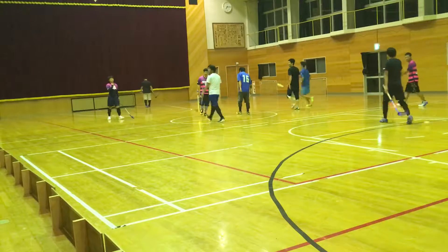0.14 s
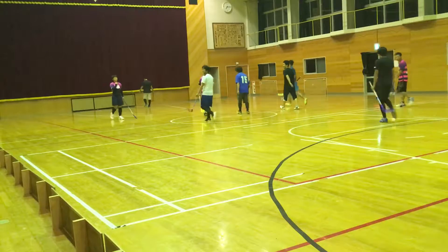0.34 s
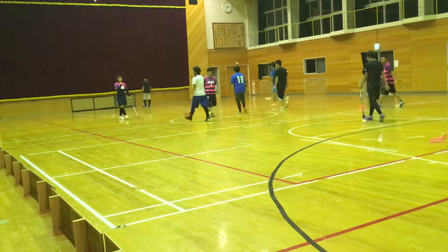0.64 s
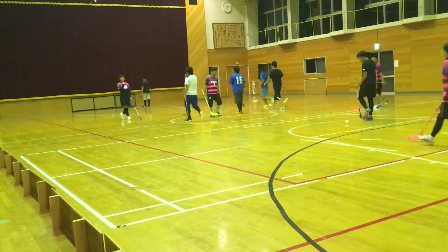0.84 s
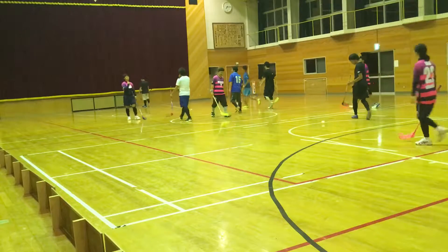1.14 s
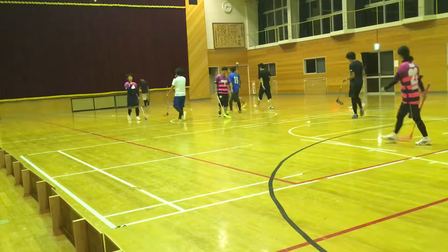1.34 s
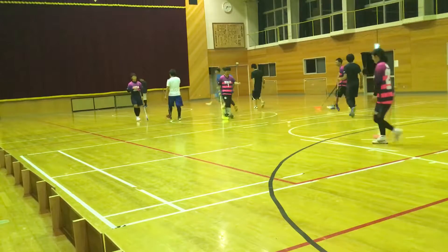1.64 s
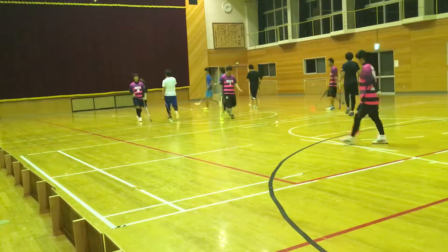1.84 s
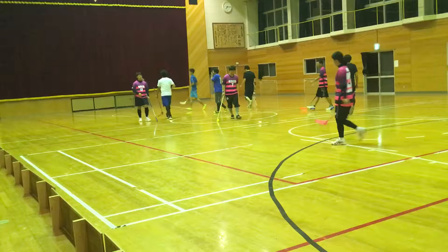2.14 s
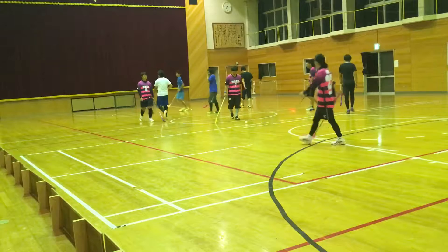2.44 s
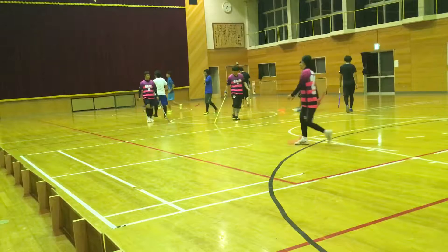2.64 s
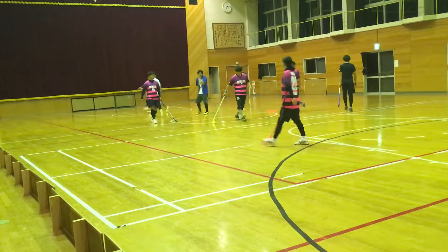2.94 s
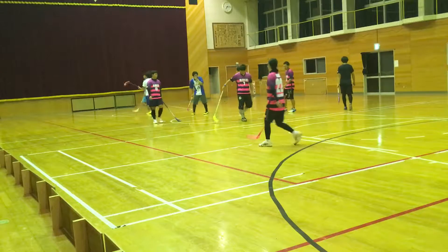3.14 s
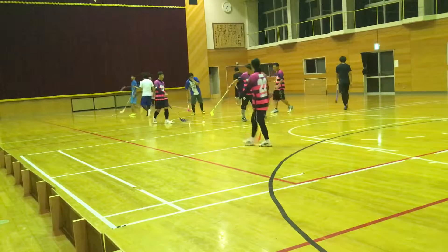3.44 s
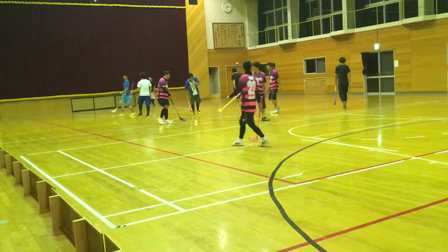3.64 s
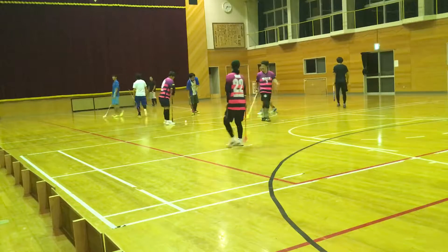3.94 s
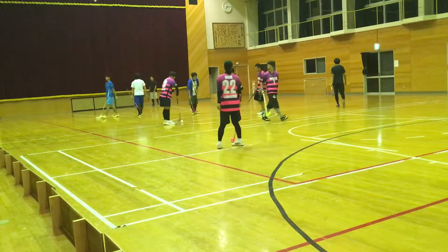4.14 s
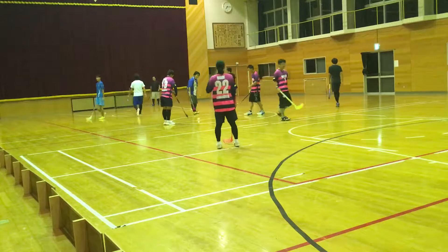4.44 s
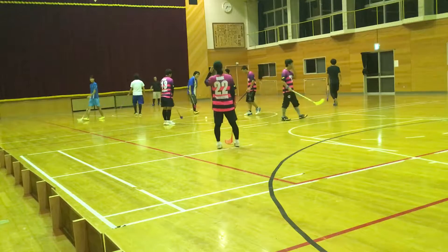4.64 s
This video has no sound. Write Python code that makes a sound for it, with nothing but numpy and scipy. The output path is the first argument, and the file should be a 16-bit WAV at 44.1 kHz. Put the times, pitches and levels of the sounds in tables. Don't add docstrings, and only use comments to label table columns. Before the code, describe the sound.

In a large echoing sports hall, sticks tick and knock, shoes squeak briefly, and running feet boom softly through the boards.

```python
import sys
import numpy as np
from scipy import signal
from scipy.fft import rfft, irfft
from scipy.io import wavfile
from scipy.ndimage import uniform_filter1d

SR = 44100
rng = np.random.default_rng(int(sys.argv[2]) if len(sys.argv) > 2 else 0)


def master_out(mix):
    frames = np.transpose(np.atleast_2d(mix))
    ceiling = np.clip(frames, -1, 1)
    pcm = np.round(ceiling * 32767).astype(np.int16)
    wavfile.write(sys.argv[1], SR, pcm)


def field_ratio(decibels):
    return 10 ** (np.asarray(decibels, dtype=float) / 20)


N = 211672
LEAD = SR


def evened(x):
    return x / np.sqrt(np.mean(x ** 2) + 1e-20)


def read(points, hz):
    f, value = np.transpose(points)
    return np.interp(np.log(hz + 1), np.log(f + 1), value)


def add(track, s, sound):
    part = track[LEAD + round(s * SR):][:len(sound)]
    part += sound[:len(part)]


def noise(spectrum, patchy_db, size):
    hz = np.fft.rfftfreq(size, 1 / SR)
    a, b, patches = rng.standard_normal((4 * N // size + 5, len(hz), 3)).T
    patches = uniform_filter1d(patches, 10, axis=0)
    patches = evened(uniform_filter1d(patches, 10, axis=1))
    z = (a + 1j * b) * field_ratio(read(spectrum, hz)[:, None] + patchy_db * patches)
    sound = signal.istft(z, nperseg=size, noverlap=3 * size // 4)[1]
    return evened(sound[:N])


def swells(rest_db, middle, length, db):
    slow = np.arange(0, N / SR + 1, 1 / 200)
    bells = field_ratio(db) * np.exp(-(2 * (slow[:, None] - middle) / length) ** 2)
    level = np.sqrt(field_ratio(rest_db) ** 2 + (bells ** 2).sum(1))
    return np.interp(np.arange(N) / SR, slow, level)


# (frequency [Hz], level [dB])
AIR = [(11, -51), (18, -26), (50, -22), (65, -11), (110, -120)]


def ventilation():
    return field_ratio(-48.5) * noise(AIR, patchy_db=4, size=2048)


# (time [s], level [dB])
PLAY_EFFORT = [(0.0, -44.5), (0.53, -44.5), (0.76, -49), (1.01, -47.5), (1.39, -48), (1.92, -47),
               (2.22, -48.5), (2.79, -50), (3.15, -48), (3.3, -49), (3.54, -54), (3.69, -51.5),
               (3.94, -47.5), (4.24, -41.5), (4.48, -50.5), (4.8, -45.5)]
# (frequency [Hz], level [dB])
PLAY_COLOUR = [(150, -35), (250, -1.5), (350, -6.5), (383, -7), (409, -6.5), (550, -12.5), (595, -11.5),
               (1050, -10.5), (1210, -12.5), (1930, -10.5), (5500, -21.5), (7150, -23.5), (12100, -120)]


def distant_play():
    effort_db = np.interp(np.arange(N) / SR, *np.transpose(PLAY_EFFORT))
    return field_ratio(effort_db - 1) * noise(PLAY_COLOUR, patchy_db=2, size=512)


# (middle [s], length [s], boom level [dB], thud level [dB])
STEPS = [(0.062, 0.097, -30.5, -36.5), (0.285, 0.23, -34, -42.5), (0.452, 0.28, -36, -46),
         (0.654, 0.15, -37, -42), (1.05, 0.9, -40.5, -47), (1.33, 0.37, -34.5, -46.5),
         (1.726, 0.29, -36, -64), (1.957, 0.48, -36, -40.5), (2.343, 0.063, -32.5, -42),
         (2.723, 0.37, -65, -39.5), (3.056, 0.075, -36.5, -44.5), (3.276, 0.19, -52, -41.5),
         (3.563, 0.13, -38, -63), (3.792, 0.068, -35, -44.5), (4.106, 0.39, -32.5, -41),
         (4.35, 0.068, -46, -41), (4.684, 0.22, -32, -71)]
# (frequency [Hz], level [dB])
BOOM = [(26, -54), (45, -7.5), (81, 2), (170, -27), (220, -25.5), (370, -120)]
# (frequency [Hz], level [dB])
THUD = [(59, -33), (100, 5), (134, -1.5), (192, -2), (242, -17), (329, -27), (500, -33.5), (650, -23),
        (1100, -120)]


def running_steps():
    middle, length, boom_db, thud_db = np.transpose(STEPS)
    boom = swells(-39, middle, length, boom_db) * noise(BOOM, patchy_db=-0.43, size=4096)
    thud = swells(-46, middle, length, thud_db) * noise(THUD, patchy_db=0.05, size=2048)
    return boom + thud


# (middle [s], length [s], level [dB])
SCUFFS = [(0.01, .2, -65), (0.447, 0.46, -60), (0.945, 0.37, -64), (1.18, 0.21, -68), (1.547, 0.56, -61),
          (2.55, 0.38, -55.5), (2.78, 0.27, -59), (3.63, 0.11, -58), (3.959, 0.44, -77), (4.252, 0.49, -54),
          (4.716, 0.21, -66)]
# (frequency [Hz], level [dB])
HISS = [(2650, -68), (4500, -8.5), (7580, -6.5), (9020, -0.5), (10500, -17.5), (13600, -38), (22000, -120)]
# (frequency [Hz], level [dB])
GRIT = [(6180, -22), (10500, -0.5), (11900, -3), (15300, -6)]


def scuffing():
    middle, length, db = np.transpose(SCUFFS)
    grit_db = -60 + 0.56 * (db - db.mean())
    hiss = swells(-65.5, middle, length, db) * noise(HISS, patchy_db=3, size=256)
    grit = swells(-60.5, middle, length, grit_db) * noise(GRIT, patchy_db=2.5, size=256)
    return hiss + grit


# (frequency [Hz], time to fall 60 dB [s])
HALL = [(300, 1.7), (1000, 1.5), (2500, 2.56), (4500, 2.29), (8000, 0.98), (13000, 0.59)]


def hall(x, count=3):
    fill_s = 0.049
    hz, t, z = signal.stft(rng.standard_normal((count, 2 * SR)), SR, nperseg=256)
    fill = np.minimum(t / fill_s, 1) ** 2
    decay = field_ratio(-60 * t / read(HALL, hz)[:, None])
    tails = signal.istft(z * fill * decay, SR, nperseg=256)[1]
    which = (np.arange(len(x)) // 3000) % count
    wet = np.zeros(len(x))
    for k, tail in enumerate(tails):
        wet += signal.fftconvolve(x * (which == k), tail / np.linalg.norm(tail))[:len(x)]
    return wet


def echoes(x, walls):
    taps = np.zeros(SR // 8)
    taps[0] = 1
    for s, db in walls:
        taps[round(s * SR)] = field_ratio(db)
    return signal.oaconvolve(x, taps)[:len(x)]


# (delay [s], level [dB])
FAR_ECHOES = [(.0072, 0.5), (.016, -8), (0.0216, -3), (.029, -9), (.052, -33), (.075, -17)]
# (delay [s], level [dB])
MID_ECHOES = [(.0065, -15), (0.0102, -4.5), (0.027, -13.5), (0.035, -39.5)]
# (delay [s], level [dB])
CORNER_ECHOES = [(.0037, 0.3), (.0076, -0.5), (.013, -13), (.0168, -11), (.0222, -6), (.028, -16)]


def early_echoes(far, mid, corner):
    return echoes(far, FAR_ECHOES) + echoes(mid, MID_ECHOES) + echoes(corner, CORNER_ECHOES)


# (multiple of body pitch [1], level [dB], time to fall 60 dB [s])
BODY = [(1.004, -2.5, 0.023), (0.532, -6, 0.015), (1.78, -21, 0.029), (2.02, -7, 0.003)]
# (frequency [Hz], level [dB])
TICK = [(1500, -8), (5000, -10.5), (8000, -1.5), (10500, -1.5), (13000, 1), (15800, -8), (17000, -12)]


def knock(tick_db, hz, body_db, tilt_db):
    tick_t60, thud_t60, sweep_s, rise_s = 0.008, 0.017, 0.0022, 0.00048
    t = np.arange(1500) / SR
    f = np.fft.rfftfreq(len(t), 1 / SR)
    spray, rattle = rng.standard_normal((2, len(t)))

    contact = 4.8 * np.exp(-2j * np.pi * sweep_s * (f - f ** 2 / SR))
    bright = field_ratio(read(TICK, f) + tilt_db * np.log2(f / 9000 + 0.45))
    spray = spray * field_ratio(-60 * t / tick_t60)
    spray = irfft((rfft(spray) + contact) * bright, len(t))
    tick = field_ratio(tick_db - 4) * spray / abs(spray).max()

    broad = np.exp(-(np.log2(f / hz + 0.017) / 1.14) ** 2)
    rattle = irfft(rfft(rattle) * broad, len(t))
    thud = field_ratio(body_db - 2 - 60 * t / thud_t60) * evened(rattle)

    body = np.zeros(len(t))
    for k, db, t60 in BODY:
        body += field_ratio(body_db + db - 60 * t / t60) * np.sin(2 * np.pi * k * hz * t)
    rise = np.minimum(t / rise_s, 1)
    facing = tick + (thud + body) * rise
    all_round = tick + (thud + 0.43 * body) * rise
    return facing, all_round


# (time [s], tick peak level [dB], body pitch [Hz], body level [dB], hall level [dB])
KNOCKS = [(0.3934, -28, 930, -53, 3), (0.4, -29.5, 1470, -37, 1), (0.4991, -34, 936, -61, 3),
          (0.592, -28, 960, -52, 0.5), (0.7537, -33, 810, -46, -6), (1.0447, -55, 800, -34.5, -1),
          (1.3461, -30.5, 1380, -31, -2), (2.9819, -40.5, 610, -48, 12), (3.482, -28.5, 644, -37.5, 5.5),
          (3.5213, -38.5, 1368, -46, 10.5), (3.979, -36, 1400, -35.5, -14), (4.1891, -24.5, 1540, -40, 2.5),
          (4.2605, -25, 1390, -46, 6), (4.616, -39, 1320, -38, 3)]
# (time [s], tick peak level [dB], body pitch [Hz], body level [dB], hall level [dB])
STICKS = [(0.042, -54, 2360, -42, -3), (0.1073, -31.5, 2570, -50, -18), (0.8119, -34.5, 2350, -44.5, 3.5),
          (0.8613, -32.5, 945, -44, 1), (0.9294, -60, 620, -43, -4), (0.9847, -37, 830, -36.5, 2),
          (1.2087, -40, 735, -38, -7), (1.2697, -34, 870, -40, 9.5), (1.2978, -26, 2550, -34, 2.5),
          (1.6638, -37, 670, -41, -19), (1.7424, -52, 1983, -51.5, 17), (1.7903, -33, 677, -42.5, 9.5),
          (2.391, -37, 2400, -36, 1.5), (2.6149, -25, 1700, -22.5, -4), (3.1074, -37, 1850, -46.5, 5),
          (4.0731, -33, 2150, -67, 15.5), (4.123, -36, 3030, -38, 3), (4.148, -20, 1370, -32, -14),
          (4.6714, -30, 735, -39.5, 5.5)]
# (time [s], tick peak level [dB], body pitch [Hz], body level [dB], hall level [dB])
EDGES = [(0.0714, -39.5, 2600, -40, -17), (0.152, -40, 2866, -59, -3), (0.3339, -39.5, 1700, -45.5, 15),
         (0.6203, -41, 623, -59, -13), (1.004, -33, 1950, -38, -15), (1.076, -30, 1090, -45, -7),
         (1.6215, -47, 985, -51, 14.5), (2.5301, -42, 770, -39.5, 5), (2.588, -28, 685, -48, 4),
         (2.682, -30.5, 1650, -51, -2), (2.7064, -30, 1690, -53, -9), (2.7364, -33, 1640, -64, -7),
         (2.9459, -32.5, 1060, -42, 7), (3.6682, -33.5, 2480, -49, 6.5), (3.8055, -35, 627, -56, -13),
         (4.1035, -23, 1410, -28, -3.5), (4.118, -30, 2270, -32, -7)]
# (time [s], tick peak level [dB], body pitch [Hz], body level [dB], hall level [dB])
HEELS = [(0.2124, -48, 455, -41, -10), (0.398, -32, 285, -37.5, -3), (1.3458, -20, 499, -45, -5),
         (1.8183, -35, 231, -38.5, -7), (2.6145, -27, 190, -55, 4.5), (3.5608, -58, 600, -49, -9),
         (4.1041, -37, 416, -36, 9.5), (4.1894, -47, 231, -55, -12), (4.3394, -34, 231, -66, 7.5)]
# (time [s], tick peak level [dB])
TIPS = [
    (.6220, -39),
    (1.3005, -27.5),
    (1.5575, -25.5),
    (4.259, -32),
    (4.4, -38),
]
# (body pitch [Hz], body level [dB], hall level [dB])
TIP_BODY = (2300, -60, -1.6)
TILTS = [-9, -5, 4, -15, 5]


def hits(mid, sent):
    tips = [(s, db, *TIP_BODY) for s, db in TIPS]
    for rows, tilt_db in zip((KNOCKS, STICKS, EDGES, HEELS, tips), TILTS):
        for s, tick_db, hz, body_db, hall_db in rows:
            facing, all_round = knock(tick_db, hz, body_db, tilt_db)
            add(mid, s, facing)
            add(sent, s, field_ratio(hall_db + 5.5) * all_round)


def slip(hz0, hz1, length, octave_db):
    wobble, chatter = 0.019, 0.17
    u = np.arange(round(length * SR)) / (length * SR)
    jitter, grip = uniform_filter1d(rng.standard_normal((2, 12000)), 40)[:, :len(u)] * 6
    hz = (hz1 + (hz0 - hz1) * (1 - u) ** 1.7) * (1 + wobble * jitter)
    turn = 2 * np.pi * np.cumsum(hz) / SR

    tone = np.sin(turn) + field_ratio(octave_db) * np.sin(2 * turn)
    overtones = (hz < 5200) * np.sin(3 * turn) + (hz < 3950) * np.sin(4 * turn)
    tone += field_ratio(-27) * overtones
    edge = np.minimum(np.minimum(u, 1 - u) * length / 0.001, 1)
    tone *= edge * (1 + chatter * grip)

    grab_s = 0.00045 * (1 + (length / 0.0074) ** 2)
    grab = tone * np.exp(-0.5 * ((u - 0.5) * length / grab_s) ** 2)
    return tone, grab * np.linalg.norm(tone) / np.linalg.norm(grab)


# (time [s], level [dB], start pitch [Hz], length [s], octave level [dB])
FAR_SLIPS = [
    (-.14, -39, 2890, 0.007, -18),
    (0.2052, -30, 4465, 0.006, -19),
    (3.886, -50, 4564, 0.0056, -35),
    (4.009, -49, 4950, 0.005, 1),
]
# (time [s], level [dB], start pitch [Hz], length [s], octave level [dB])
MID_SLIPS = [
    (1.010, -44.5, 4980, 0.02, 6),
    (1.06, -51, 5400, 0.018, -20),
    (1.06, -40.5, 5030, 0.023, -4),
    (4.136, -24, 4593, 0.013, -17),
]
# (time [s], level [dB], start pitch [Hz], length [s], octave level [dB])
SKIDS = [
    (1.558, -44.5, 6070, 0.0035, 9.5),
    (3.431, -61, 5710, 0.021, 5),
    (3.9745, -47, 5340, 0.014, -6),
    (4.05, -55, 5400, 0.005, 1),
    (4.1503, -43.5, 4367, 0.03, -2),
]
# (time [s], level [dB], start pitch [Hz], length [s], octave level [dB])
HIDDEN = [(.209, -41, 4450, 0.0055, -22), (0.9721, -47.5, 4996, 0.028, -3.5), (1.032, -49, 5400, .006, -20),
          (1.042, -41.5, 4960, 0.013, -6.5), (1.075, -45, 5280, 0.0056, -18), (1.106, -43, 4890, 0.01, -22),
          (3.554, -47, 2795, 0.007, -22), (3.591, -48, 2880, 0.0055, -22), (4.166, -39, 3996, 0.0068, -14),
          (4.145, -43, 4800, 0.0067, -15)]
# (time [s], level [dB], start pitch [Hz], length [s], octave level [dB])
DRAGS = [
    (-.031, -52.5, 3039, .254, -27),
    (.813, -58, 5700, .012, -21),
    (0.856, -54, 5950, .012, -21),
    (3.482, -43.5, 2696, 0.0075, -25),
    (4.11, -40, 5810, .004, -21),
    (4.44, -46, 6200, .016, -8),
]
# (time [s], level [dB], start pitch [Hz], length [s], octave level [dB])
CORNER = [
    (2.34, -19.5, 3957, .0042, -18.5),
]
# (share of pitch lost [1], hall level [dB])
SAGS = [(0.021, 4), (.075, -4), (.18, 1.5), (.071, 7.5), (0.051, 1), (-0.031, 1.5)]


def slips(far, mid, corner, sent):
    places = (far, mid, mid, mid, mid, corner)
    kinds = (FAR_SLIPS, MID_SLIPS, SKIDS, HIDDEN, DRAGS, CORNER)
    for place, rows, (sag, hall_db) in zip(places, kinds, SAGS):
        for s, db, hz, length, octave_db in rows:
            facing, all_round = slip(hz, hz * (1 - sag), length, octave_db)
            add(place, s, field_ratio(db) * facing)
            add(sent, s, field_ratio(db + hall_db) * all_round)


def scene():
    far, mid, corner, sent = np.zeros((4, LEAD + N))
    slips(far, mid, corner, sent)
    hits(mid, sent)
    players = early_echoes(far, mid, corner) + field_ratio(-4) * hall(sent)
    background = ventilation() + distant_play() + running_steps() + scuffing()
    return (players[LEAD:] + background)[None]


def band_limit(x):
    return signal.sosfilt(signal.butter(12, 16660, fs=SR, output="sos"), x)


# (frequency [Hz], width [Hz], level [dB])
PORT_NOTCH = (10600, 600, -4)


def record(dry):
    hz = np.fft.rfftfreq(N, 1 / SR)
    notch_hz, width, notch_db = PORT_NOTCH
    notch = field_ratio(notch_db * np.exp(-((hz - notch_hz) / width) ** 2))
    heard = irfft(rfft(dry) * notch, N)
    lowpass = signal.firwin(511, 15800, window=("kaiser", 9), fs=SR)
    heard = signal.oaconvolve(heard, lowpass[None], "same")
    return band_limit(heard)


dry = scene()
out = record(dry)
master_out(out)
```